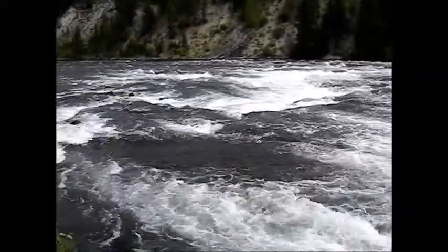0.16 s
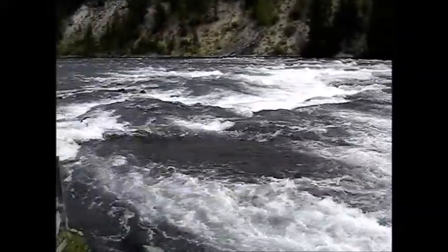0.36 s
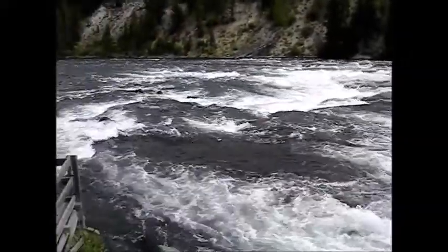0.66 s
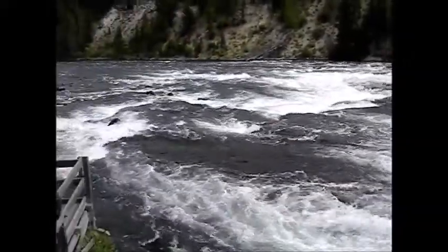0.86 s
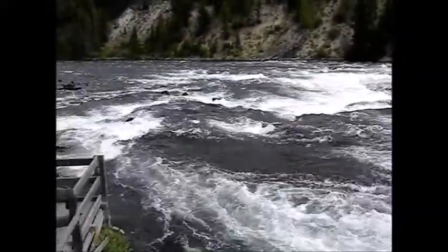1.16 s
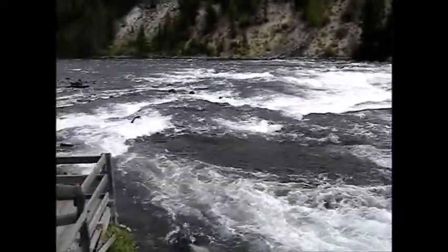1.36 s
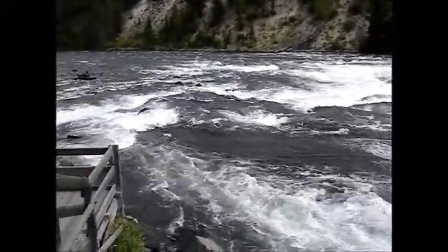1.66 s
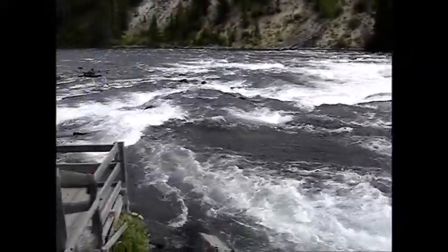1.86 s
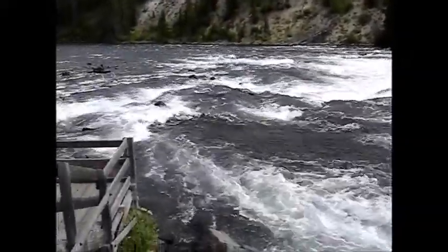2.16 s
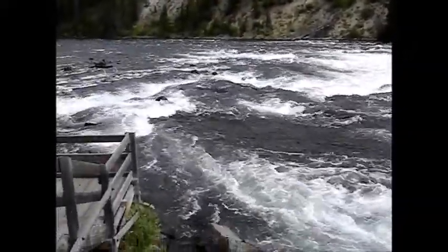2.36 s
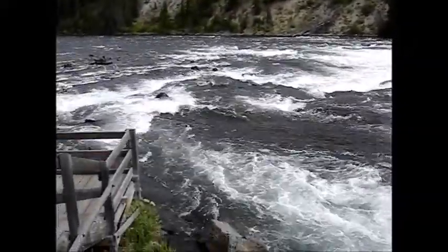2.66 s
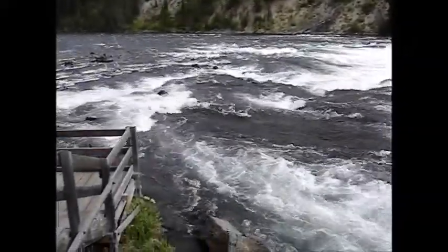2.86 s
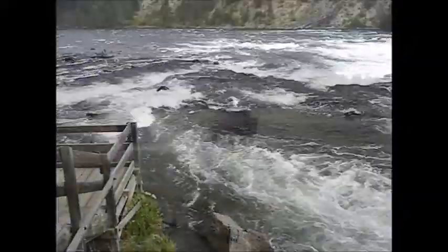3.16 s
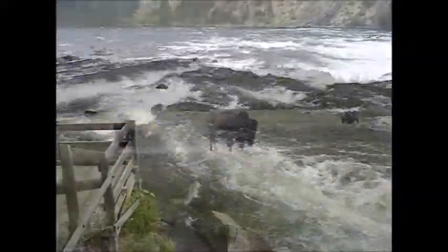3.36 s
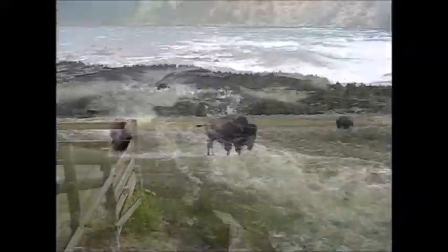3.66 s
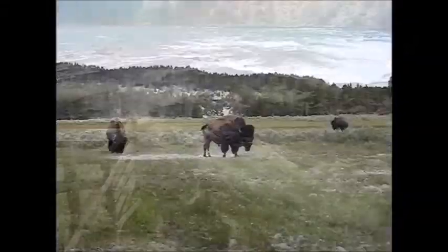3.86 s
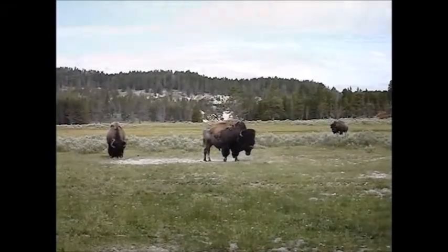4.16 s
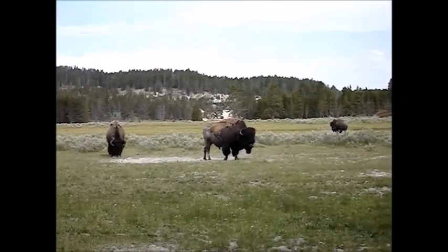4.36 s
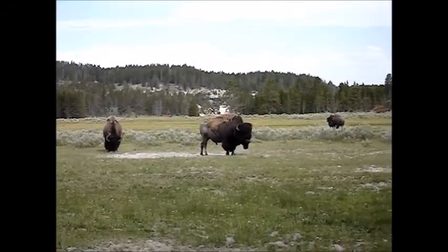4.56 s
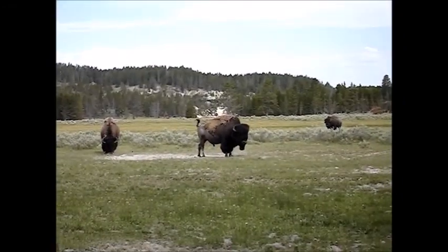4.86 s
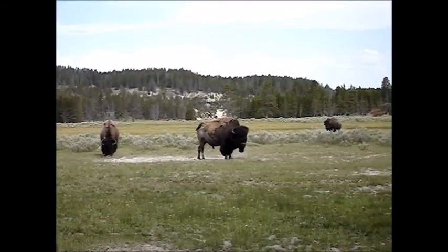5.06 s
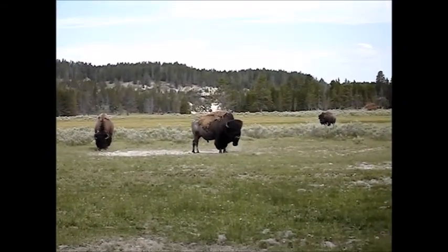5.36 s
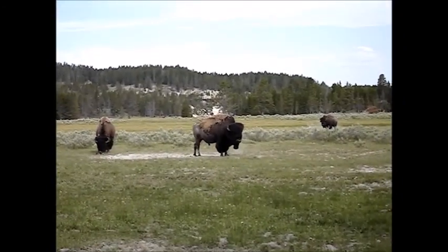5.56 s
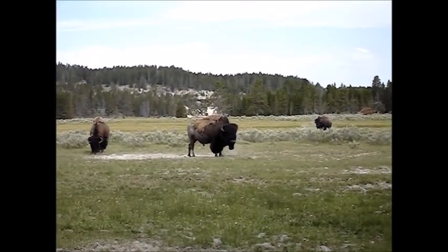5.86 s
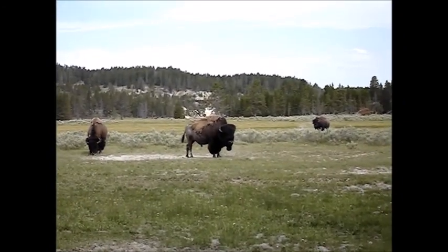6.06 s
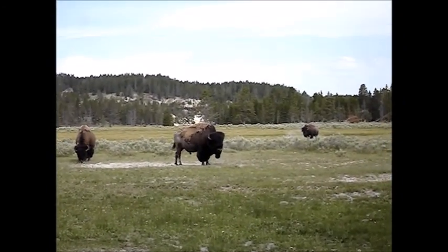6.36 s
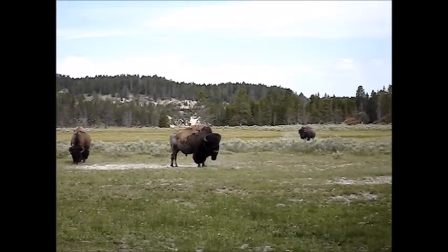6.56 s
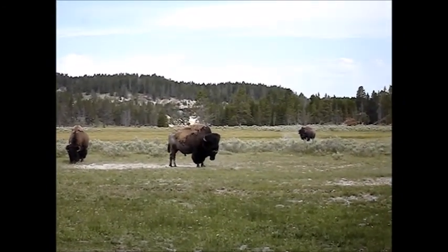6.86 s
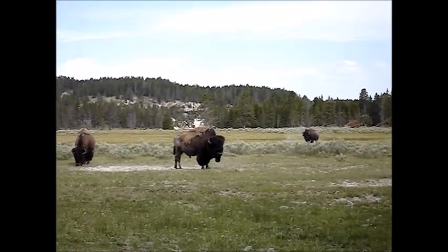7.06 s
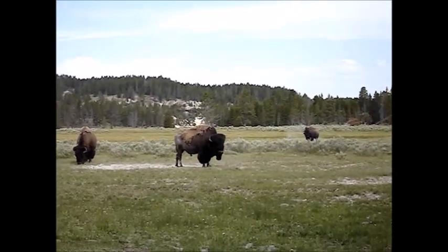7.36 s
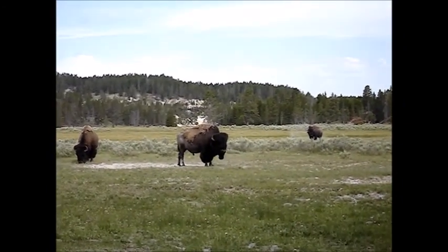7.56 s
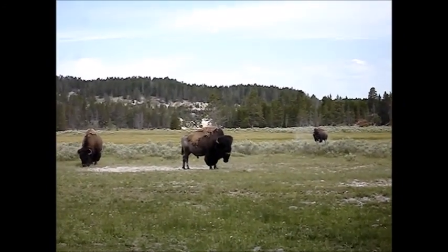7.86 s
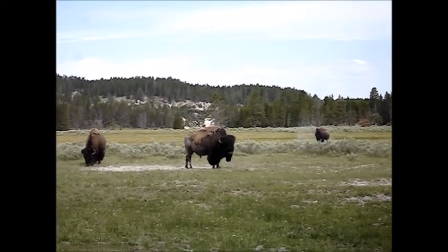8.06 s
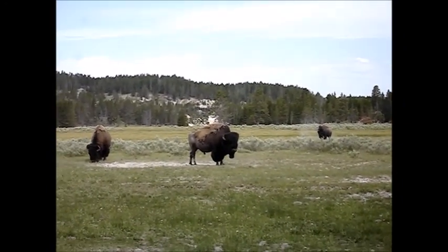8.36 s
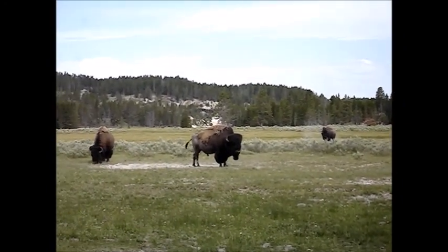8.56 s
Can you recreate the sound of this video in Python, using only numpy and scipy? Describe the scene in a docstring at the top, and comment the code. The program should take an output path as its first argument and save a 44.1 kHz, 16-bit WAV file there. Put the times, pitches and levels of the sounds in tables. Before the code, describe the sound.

Whitewater roars and splashes, then cuts to soft open air, faint far-off engines and distant birds chirping.

```python
"""A dense roar of whitewater comes first: turbulence churns, trapped bubbles resonate, plunging waves
thud and spray patters back. At about 4.1 s the scene changes abruptly to a quiet meadow with a far rush
of air and traffic. Engines hum at their firing rates, one speeding up, tyres pass, and distant birds
whistle with echoes. A small motor whines thinly over a faint hiss. Both channels are alike."""
import sys
import numpy as np
from scipy import signal
from scipy.fft import rfft, irfft, next_fast_len
from scipy.io import wavfile

SR = 44100
rng = np.random.default_rng(int(sys.argv[2]) if len(sys.argv) > 2 else 0)


def waveform_to_disk(signal):
    """Save audio, clipped to [-1, 1], as 16-bit WAV at the path in sys.argv[1]."""
    frames = np.transpose(np.atleast_2d(signal))
    scaled = np.clip(frames, -1, 1) * 32767
    samples = np.round(scaled).astype(np.int16)
    wavfile.write(sys.argv[1], SR, samples)


N = 383661
TIME = np.arange(N) / SR
SCENE_CHANGE_S, ENGINE_FADE_S = 4.1095, 0.35

# Slow swell of the rapids about their mean level: t/s, level/dB
FLOW_SWELL = [(0, 0.1), (0.85, 0.6), (1.45, 0.3), (1.62, -1.5), (1.8, 0), (2.9, 0.86), (3.6, -0.7),
              (4.1, 0)]
# Spectral density of the deep churning: f/Hz, relative level/dB
ROAR_SPECTRUM = [(20, -33), (40, -33), (62, -22), (95, -19.5), (145, -12), (205, -7.5), (280, -6),
                 (370, -4.5), (550, 1), (800, -0.5), (1100, -3), (1600, -6), (2400, -24), (5000, -40)]
# Spectral density of the spray: f/Hz, relative level/dB
SPRAY_SPECTRUM = [(500, -27), (1000, -9), (1500, -2.5), (2050, 1), (2500, -3), (3500, -4.5), (5000, -8),
                  (6300, -12.5), (7800, -18), (10000, -24), (12000, -29)]
# Collapsing waves: t/s, level/dB
WAVE_PLUNGES = [(0.02, -36), (0.95, -41), (2.15, -38), (2.27, -46), (2.98, -42), (3.27, -43), (3.9, -48)]
# Spectral density of the far rush: f/Hz, relative level/dB
RUSH_SPECTRUM = [(20, -21), (45, -13), (65, -6.5), (130, -6.5), (250, -12.5), (380, -10.5), (600, -4.5),
                 (950, -0.5), (1250, -4), (1550, -5), (2100, -11.5), (2800, -19), (4000, -32), (9000, -49)]
# Spectral density of the microphone hiss: f/Hz, relative level/dB
HISS_SPECTRUM = [(500, 2), (3000, 2), (5000, 0), (7000, -1.5), (7700, 2), (8400, -1.5), (10000, -4.5)]
# Vehicles at their nearest point: t/s, level/dB
VEHICLE_PASSES = [(4.3, -53.5), (7.8, -48)]
# Spectral density of tyre noise: f/Hz, relative level/dB
TYRE_SPECTRUM = [(100, -32), (250, -9), (330, -4), (430, 1), (560, 0), (750, -9), (1500, -25), (4000, -55)]
# Far engines at steady speed: start t/s, end t/s, firing f/Hz, level/dB
ENGINE_DRONES = [(3.9, 5.7, 79.3, -55), (5.0, 6.9, 127, -63.5), (5.7, 7.8, 79.6, -66),
                 (6.9, 8.9, 127.5, -55.5), (8.0, 8.9, 75.3, -57)]
# A bird's dry tick as its song begins: t/s, level/dB
BIRD_TICKS = [(6.433, -44)]
# Spectral density of the tick: f/Hz, relative level/dB
TICK_SPECTRUM = [(2000, -35), (3300, -13), (4000, -6), (4650, 0), (5300, -11), (6500, -16), (9000, -35)]
# Bird whistles: onset t/s, duration/s, start f/Hz, middle f/Hz, end f/Hz, level/dB
BIRD_NOTES = [(6.428, 0.063, 2485, 2290, 2130, -42.5), (6.485, 0.088, 2290, 2355, 2420, -45),
              (6.58, 0.057, 2960, 2980, 2940, -44), (6.648, 0.067, 2350, 2120, 2000, -45),
              (7.038, 0.12, 2980, 2920, 2800, -54), (7.17, 0.073, 2810, 2790, 2850, -48),
              (7.245, .065, 2840, 2845, 2840, -49), (7.68, 0.088, 2960, 2900, 2800, -55),
              (7.833, .085, 3480, 3280, 3100, -54), (7.936, .035, 2380, 2250, 2140, -49)]


def from_db(db):
    """Amplitude ratio: tenfold for every 20 dB."""
    return 10 ** (np.asarray(db) / 20)


def unit_rms(x):
    """Normalisation to unit mean power."""
    return x / np.sqrt(np.mean(x ** 2) + 1e-20)


def colour(x, spectrum):
    """Spectral shaping by a curve interpolated over log frequency; rms 1."""
    hz, db = np.transpose(spectrum)
    size = next_fast_len(2 * N)
    bin_hz = np.maximum(np.fft.rfftfreq(size, 1 / SR), 1)
    gain = from_db(np.interp(np.log(bin_hz), np.log(hz), db))
    return unit_rms(irfft(rfft(x, size) * gain, size)[:N])


def drift(corner_hz):
    """Slow random fluctuation: noise twice through a one-pole low-pass; rms 1."""
    step, settle = 40, 2000
    pole = np.exp(-2 * np.pi * corner_hz * step / SR)
    noise = rng.standard_normal(N // step + settle + 2)
    slow = signal.lfilter([1], [1, -2 * pole, pole * pole], noise)[settle:]
    return np.interp(np.arange(N) / step, np.arange(len(slow)), unit_rms(slow))


def turbulence(spread_db, rate_hz):
    """Turbulent noise: each half-octave band swells and sinks independently."""
    size = next_fast_len(N)
    white = rfft(rng.standard_normal(size))
    band_of_bin = np.floor(2 * np.log2(np.clip(np.fft.rfftfreq(size, 1 / SR), 64, 11000)))
    bands = (irfft(white * (band_of_bin == k), size)[:N] for k in np.unique(band_of_bin))
    return unit_rms(sum(band * from_db(spread_db * drift(rate_hz)) for band in bands))


def impacts(per_s, spread_db):
    """A Poisson process of clicks, many small and a few large."""
    struck = rng.random(N) < per_s / SR
    return struck * from_db(spread_db * np.minimum(rng.exponential(1, N), 4))


def bursts(events, rise_s, decay_s):
    """Transient envelopes: a linear rise to each event's time, then exponential decay."""
    envelope = np.zeros(N)
    for peak_s, level_db in events:
        attack = np.clip(1 + (TIME - peak_s) / rise_s, 0, 1)
        decay = np.exp(-np.maximum(TIME - peak_s, 0) / decay_s)
        envelope += from_db(level_db) * attack * decay
    return envelope


def bubbles(per_s, low_hz, high_hz, cycles, rise, spread_db=3, sizes=36):
    """Damped resonance of trapped air: larger bubbles ring lower, and each rises nearing the surface."""
    births = impacts(per_s, spread_db)
    size_class = rng.integers(0, sizes, N)
    pitches = low_hz * (high_hz / low_hz) ** ((np.arange(sizes) + rng.random(sizes)) / sizes)
    ringing = np.zeros(N)
    for k, hz in enumerate(pitches):
        age = np.arange(0, 1, hz / (cycles * SR))   # share of the time to decay by 60 dB
        ping = np.sin(2 * np.pi * cycles * age * (1 + rise * age / 2)) * from_db(-60 * age)
        ringing += np.sqrt(hz) * signal.oaconvolve(births * (size_class == k), ping)[:N]
    high_pass = signal.butter(2, low_hz / 2, "high", fs=SR, output="sos")
    return unit_rms(signal.sosfilt(high_pass, ringing))


def roar():
    """Turbulence in plunging water radiates broadband noise; bubble resonance adds a gurgle."""
    gurgle = bubbles(per_s=1500, low_hz=187.3, high_hz=2430, cycles=17, rise=0.15)
    return colour(turbulence(spread_db=0.73, rate_hz=12) + from_db(-17) * gurgle, ROAR_SPECTRUM)


def thuds():
    """The impact of each collapsing wave excites a burst of low-frequency noise."""
    band_pass = signal.butter(2, [52, 115], "band", fs=SR, output="sos")
    rumble = unit_rms(signal.sosfilt(band_pass, rng.standard_normal(N)))
    return bursts(WAVE_PLUNGES, rise_s=0.022, decay_s=0.065) * rumble


def spray():
    """Countless bursting bubbles sum incoherently to a hiss; drops patter and small bubbles fizz."""
    flurries = from_db(1.5 * drift(12))
    drops = unit_rms(impacts(per_s=3500, spread_db=3.5) * rng.choice([-1, 1], N) * flurries)
    fizz = bubbles(per_s=3000, low_hz=1400, high_hz=8000, cycles=9, rise=0.2)
    foam = turbulence(spread_db=0.3, rate_hz=9)
    return colour(foam + from_db(-5.5) * drops + from_db(-11.5) * fizz, SPRAY_SPECTRUM)


def rapids():
    """Common modulation: the flow's swell and quick surges move the roar and, more weakly, the spray."""
    swell_db = np.interp(TIME, *np.transpose(FLOW_SWELL))
    flow_db = swell_db + 0.32 * drift(5)
    return from_db(-18 + flow_db) * roar() + thuds() + from_db(-18.5 + 0.29 * flow_db) * spray()


def far_rush():
    """Distant air and traffic sum incoherently to a smooth noise with slight gusts."""
    gust_db = 0.1 * drift(2)
    return from_db(-40 + gust_db) * colour(turbulence(spread_db=0.78, rate_hz=7.2), RUSH_SPECTRUM)


def motor_whine(hz=7650, turns_per_s=30, bend_hz=28, throb=0.2):
    """Frequency and amplitude modulation: each turn of a small motor bends its pitch and level."""
    turn = np.cos(2 * np.pi * turns_per_s * TIME)
    phase = 2 * np.pi * np.cumsum(hz - bend_hz * turn) / SR
    return from_db(-63.5) * unit_rms((1 + throb * turn) * np.sin(phase))


def hiss():
    """Microphone self-noise: faint, stationary and broadband."""
    return from_db(-53) * colour(rng.standard_normal(N), HISS_SPECTRUM)


def tyres(half_amplitude_s=0.32):
    """Amplitude falls with distance, so tyre noise swells as each vehicle nears and sinks as it leaves."""
    envelope = sum(from_db(level_db) / (1 + ((TIME - nearest_s) / half_amplitude_s) ** 2)
                   for nearest_s, level_db in VEHICLE_PASSES)
    return envelope * colour(rng.standard_normal(N), TYRE_SPECTRUM)


def engine(firing_hz, level_db, octave_db, waver_db):
    """Of the firing harmonics only the lowest two carry this far; the air makes them waver."""
    phase = 2 * np.pi * np.cumsum(firing_hz * (1 + 0.00574 * drift(4))) / SR
    tone = unit_rms(np.sin(phase) + from_db(octave_db) * np.sin(2 * phase))
    return from_db(level_db + waver_db * drift(3)) * tone


def steady_engines():
    """A constant firing rate holds each drone's pitch as it fades in and out of earshot."""
    drones = np.zeros(N)
    for start_s, end_s, firing_hz, level_db in ENGINE_DRONES:
        fade = np.clip(0.5 + np.minimum(TIME - start_s, end_s - TIME) / ENGINE_FADE_S, 0, 1)
        drones += fade * engine(firing_hz, level_db, octave_db=-20, waver_db=1.2)
    return drones


def climbing_engine(throttle_s=6.95, lag_s=0.9, slow_hz=101.7, fast_hz=127.5):
    """First-order response: as the throttle opens, a throbbing note grows louder and nears a new pitch."""
    climb = 1 - np.exp(-np.maximum(TIME - throttle_s, 0) / lag_s)
    firing_hz = slow_hz + (fast_hz - slow_hz) * climb
    load = np.clip(1 + (TIME - throttle_s) / ENGINE_FADE_S, 0, 1)
    throb = np.cos(2 * np.pi * (TIME - 4.57) / 0.77)   # period 0.77 s, with a crest at 4.57 s
    level_db = -59 + 2 * load + 4 * (1 - load / 2) * throb
    return engine(firing_hz, level_db, octave_db=-8, waver_db=-0.5)


def birds(roughness=0.35, waver=0.0089):
    """A dry tick and gliding whistles, roughened by random modulation in the air."""
    song = bursts(BIRD_TICKS, rise_s=0.002, decay_s=0.009) * colour(rng.standard_normal(N), TICK_SPECTRUM)
    pitch_waver = 1 + waver * drift(86)
    for onset_s, duration_s, *glide_hz, level_db in BIRD_NOTES:
        progress = np.clip((TIME - onset_s) / duration_s, 0, 1)
        hz = np.interp(progress, [0, 0.5, 1], glide_hz) * pitch_waver
        arch = np.sqrt(4 * progress * (1 - progress))
        song += from_db(level_db) * arch * np.sin(2 * np.pi * np.cumsum(hz) / SR)
    return song * (1 + roughness * drift(60))


def forest_echo(direct, echo_db=-3, t60_s=0.6):
    """Reverberation: reflections from the forest edge add an exponentially decaying tail."""
    age_s = np.arange(SR) / SR
    response = rng.standard_normal(SR) * from_db(-60 * age_s / t60_s)
    response /= np.linalg.norm(response)
    return direct + from_db(echo_db) * signal.oaconvolve(direct, response)[:N]


def meadow():
    """Superposition of independent sources: rush, traffic, birds, whine and hiss."""
    rush = far_rush()
    traffic = tyres() + steady_engines() + climbing_engine()
    return rush + traffic + forest_echo(birds()) + motor_whine() + hiss()


def scene():
    """The rapids give way to the meadow in one instant, alike in both channels."""
    mono = np.where(TIME < SCENE_CHANGE_S, rapids(), meadow())
    return np.stack([mono, mono])


def record(dry):
    """Band limiting: a steep elliptic low-pass removes the treble above 10050 Hz."""
    return signal.sosfilt(signal.ellip(14, 0.1, 80, 10050, fs=SR, output="sos"), dry)


dry = scene()
out = record(dry)
waveform_to_disk(out)
```